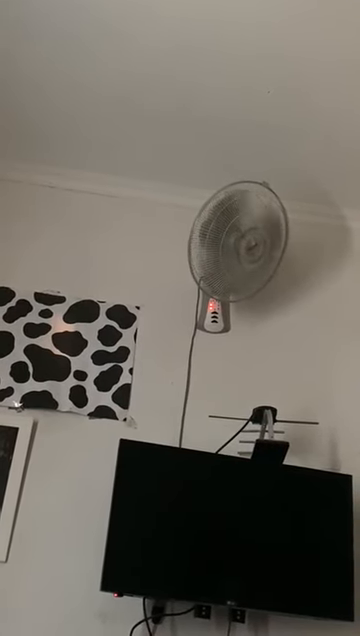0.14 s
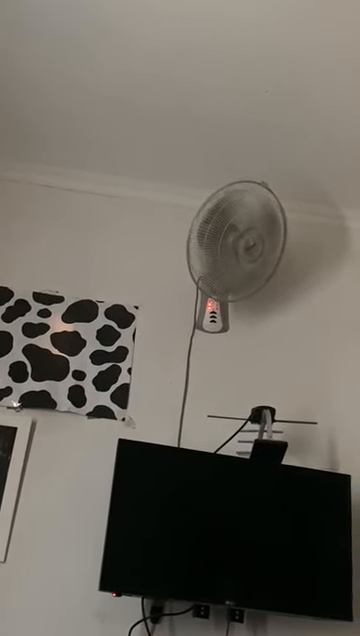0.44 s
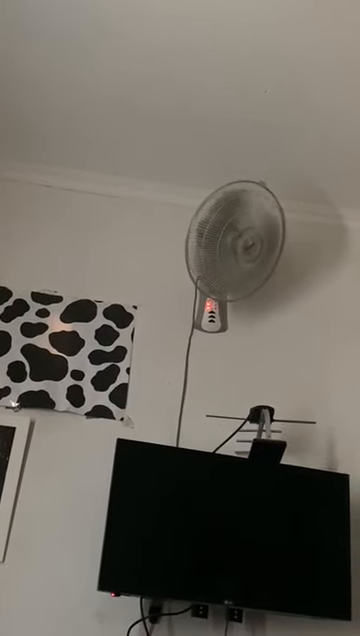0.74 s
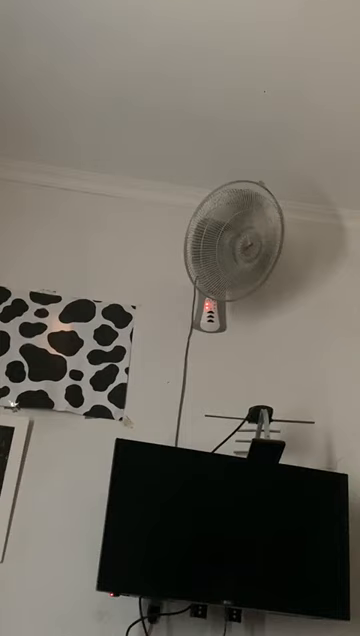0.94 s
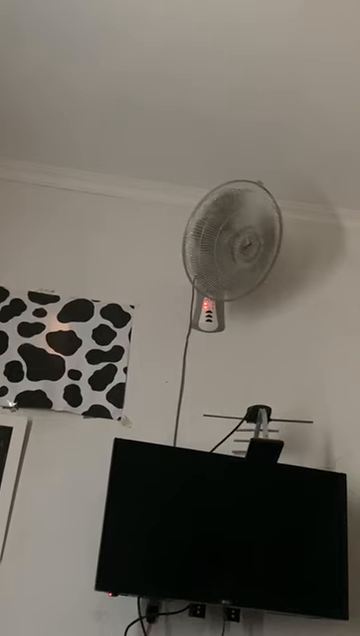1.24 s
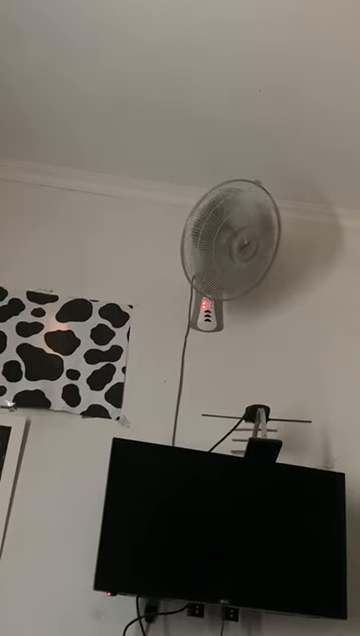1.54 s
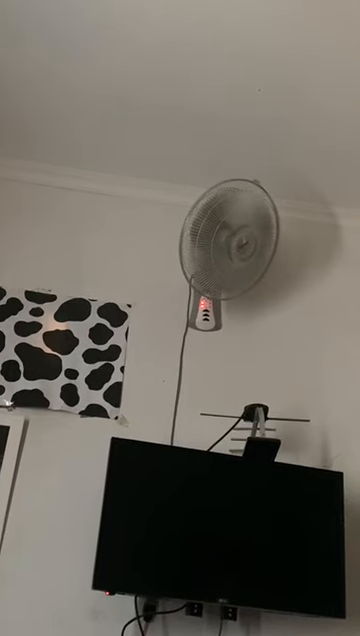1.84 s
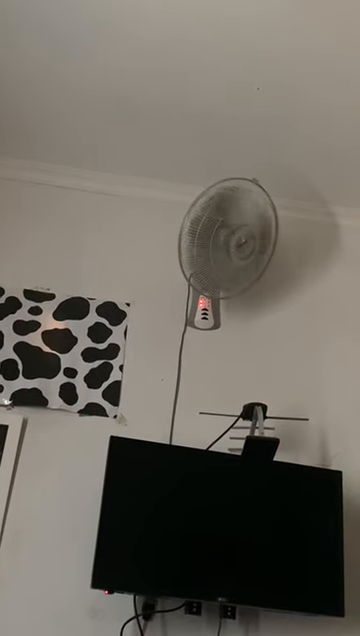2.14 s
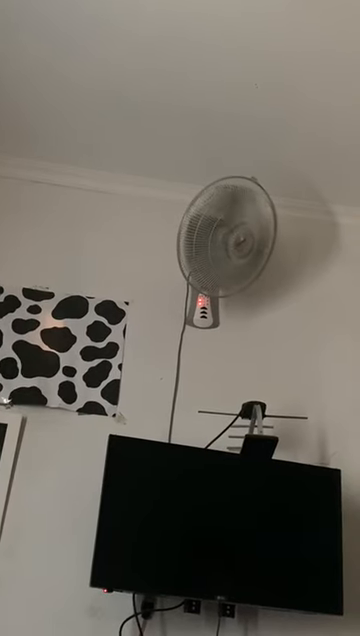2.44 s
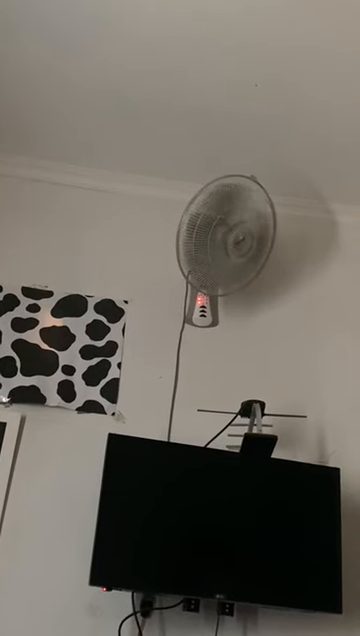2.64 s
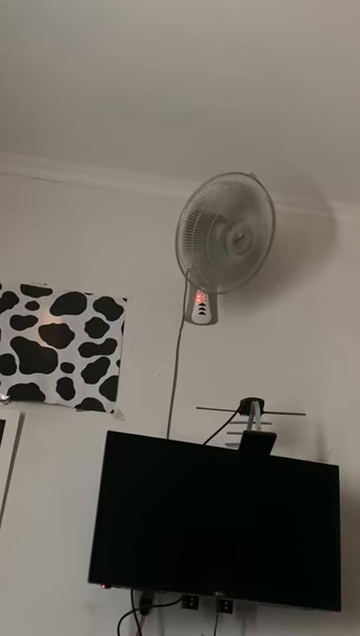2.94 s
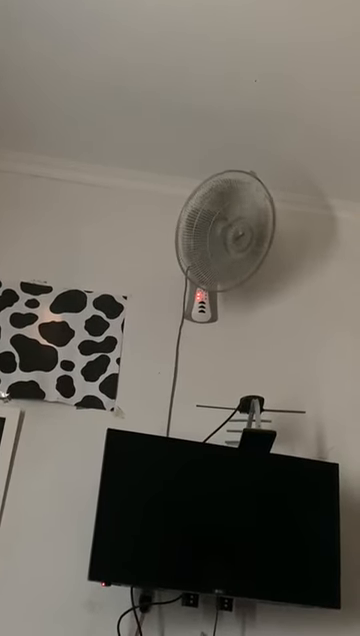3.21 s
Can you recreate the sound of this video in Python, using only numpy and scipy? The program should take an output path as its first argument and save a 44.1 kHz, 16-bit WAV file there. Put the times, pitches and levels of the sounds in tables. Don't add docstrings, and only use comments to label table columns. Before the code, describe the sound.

Continuous motor hum and soft moving air from a wall fan, with a fast fluttering rattle that speeds up and hardens gradually; small room, close stereo pickup with thin, patchy treble.

```python
import sys
import numpy as np
from scipy import signal
from scipy.fft import rfft, irfft
from scipy.io import wavfile

SR = 44100
rng = np.random.default_rng(int(sys.argv[2]) if len(sys.argv) > 2 else 0)


def master(y):
    cut = np.clip(np.atleast_2d(y).T, -1, 1)
    pcm = np.round(cut * 32767)
    wavfile.write(sys.argv[1], SR, pcm.astype(np.int16))


def magnitude_from_level(level_db):
    exponent = np.asarray(level_db, float) / 20
    return 10 ** exponent


N = 148617

# t/s, f/Hz
WOBBLE_RATE = [(0.0, 5.992), (0.48, 6.683), (0.96, 7.201), (1.44, 7.578), (1.93, 7.847), (2.41, 8.041),
               (2.89, 8.192), (3.37, 8.332)]
# order/1, level/dB
HUM_OVERTONES = [(1, -52.5), (2, -67.5), (3, -69.5), (4, -66.5), (5, -57.5), (6, -68), (7, -61), (8, -58.5),
                 (9, -62), (10, -67.5), (11, -78.5), (12, -76.5), (13, -63.5), (14, -72), (15, -75),
                 (16, -71), (17, -96), (18, -84.3), (19, -81.0), (20, -78), (21, -80.5), (22, -100.1),
                 (23, -81)]
# order/1, offset/(beats per wobble), level/dB, swell lag/beats
THROB_SIDEBANDS = [(2, -1, -65.8, 0.46), (2, 1, -58.9, 0.58), (3, -3, -76.0, 0.45), (3, -1, -53.4, 0.13),
                   (3, 1, -51.3, 0.02), (3, 2, -72.3, 0.76), (4, -2, -74.3, 0.98), (4, -1, -66.0, 0.17),
                   (4, 1, -62.7, 0.08), (4, 2, -66.5, 0.77), (4, 3, -77.7, 0.23), (5, -5, -76.5, 0.18),
                   (5, -4, -74.3, 0.37), (5, -3, -65.3, 0.82), (5, -2, -71.2, 0.79), (5, -1, -57.7, 0.83),
                   (5, 1, -57.2, 0.8), (5, 2, -69.5, 0.81), (5, 3, -75.8, 0.35), (5, 4, -78.3, 0.06),
                   (6, -2, -62.1, 0.89), (6, -1, -61.1, 0.11), (6, 1, -71.2, 0.01), (6, 2, -67.6, 0.24),
                   (7, -2, -68.2, 0.79), (7, -1, -68.2, 0.77), (7, 1, -60.3, 0.39), (7, 2, -71.6, 0.64),
                   (7, 3, -69.3, 0.75), (8, -3, -69.4, 0.91), (8, -2, -68.2, 0.18), (8, -1, -66.4, 0.45),
                   (8, 1, -66.0, 0.2), (8, 3, -77.1, 0.67), (9, -4, -74.4, 0.52), (9, -3, -68.0, 0.12),
                   (9, -2, -70.7, 0.64), (9, -1, -61.5, 0.29), (9, 1, -61.5, 0.69), (9, 2, -75.3, 0.54),
                   (9, 3, -70.7, 0.55), (10, -3, -74.9, 0.43), (10, -1, -65.4, 0.56), (10, 2, -75.8, 0.41),
                   (11, -4, -82.9, 0.76), (11, -3, -79.9, 0.59), (11, -2, -71.9, 0.45),
                  (11, -1, -73.5, 0.08), (11, 1, -68.8, 0.08), (11, 2, -79.5, 0.47), (12, -3, -83.1, 0.36),
                  (12, 1, -82.8, 0.43), (13, -4, -81.1, 0.07), (13, -3, -80.4, 0.82), (13, -2, -81.4, 0.26),
                  (13, -1, -75.9, 0.86), (14, 3, -82.4, 0.89), (15, -2, -78.5, 0.82), (15, -1, -76.6, 0.53),
                  (16, -1, -81.9, 0.22), (17, 1, -79.6, 0.55), (17, 2, -80.8, 0.51), (18, -3, -81.2, 0.77),
                  (18, -2, -79.8, 0.89), (18, 1, -80.8, 0.12), (18, 2, -82.7, 0.24), (18, 3, -80.0, 0.33),
                  (18, 5, -81.2, 0.84), (19, -3, -80.9, 0.23), (19, -1, -76.1, 0.84), (19, 1, -79.1, 0.41),
                  (19, 4, -82.5, 0.97), (20, -2, -83.0, 0.17), (20, -1, -77.6, 0.01), (20, 3, -82.7, 0.85),
                  (21, -5, -80.4, 0.84), (21, 1, -75.6, 0.89), (21, 2, -73.3, 0.04), (21, 3, -76.9, 0.13),
                  (23, 1, -81.3, 0.08)]
# f/Hz, level/dB
AIR_SPECTRUM = [(22, -12.5), (80, 1.5), (220, -10), (490, -2), (680, -9.5), (900, -5.5), (1200, -12.5),
                (4000, -37)]
# angle/turns, level/dB
SLACK_CYCLE = [(0, 1), (.2, -1), (.35, -7), (.55, -8), (.68, -8), (.77, 0), (.9, 1.1), (1, 0)]
# f/Hz, level/dB
CHATTER_SPECTRUM = [(1550, -12.5), (1850, 3), (2120, -1), (2350, -6), (4000, -3), (6000, -2.5), (9500, -8),
                    (12500, -15)]
# place/pulls, strongest wobble angle/turns, width/turns, level/dB
TICK_PLACES = [
    (0, .88, .06, -33.5),
    (0, .17, .05, -39),
    (0, .55, .08, -52),
    (.26, .97, .04, -40),
    (.45, .95, .04, -46),
]
# f/Hz, width/Hz, level/dB
GUARD_MODES = [(3270, 390, -12.5), (4070, 545, -4), (5840, 690, -0.5), (7720, 2300, -3.5),
               (10300, 1300, -8.5)]
# f/Hz, left minus right level/dB
PORT_BALANCE = [(150, -0.04), (400, 3), (700, 2.5), (900, 11.5), (1010, 1), (1110, 11), (1300, -0.5),
                (2300, 0.26)]
# f/Hz, phase/rad
PORT_PHASE = [(600, -0.18), (800, 0.5), (1400, 0.26), (4200, 0.37), (5100, 2.5), (5500, 1.57),
              (6200, 1.7857), (7800, 2.5)]
# f/Hz, level/dB
WALL_SPECTRUM = [(100, -34.5), (300, -22.5), (600, -10.5), (1000, -5), (1600, -11), (2300, -10)]
# f/Hz, level per bin/dB
MUTE_FLOOR = [(4000, -100), (5200, -95.5), (8000, -94.5), (9500, -92), (11500, -89.5)]
# f/Hz, spread/dB
MUTE_FLOOR_SPREAD = [(5000, 2), (8000, 4), (10000, 7)]
# t/s, from f/Hz, to f/Hz
UNMUTED_MOMENTS = [(.045, 1900, 8000), (.08, 7100, 7500), (.065, 11200, 11350), (.22, 1900, 7600),
                   (.222, 8400, 9400), (.378, 6900, 7700), (.378, 7950, 8150), (.533, 11200, 11500),
                   (.54, 7050, 7300), (.683, 6950, 7600), (.818, 6950, 7600), (.888, 7050, 7250),
                   (.888, 7450, 7650), (1.26, 7050, 7250), (1.26, 7450, 7650), (1.364, 1900, 11800),
                   (1.4915, 1900, 11800), (1.56, 6950, 7150), (1.631, 1900, 11800), (1.933, 7200, 7400),
                   (2.012, 1900, 11800), (2.035, 7050, 7250), (2.188, 7150, 7350), (2.2575, 1900, 11800),
                   (2.31, 7200, 7500), (2.53, 7050, 7250), (2.555, 7150, 7600), (2.63, 7350, 7550),
                   (2.885, 6900, 7300), (2.955, 7150, 7350), (3.0, 7350, 7600), (3.048, 7150, 7350)]

HUM_HZ, FIRST_PULL_S, FIRST_TURN = 100.142, .2388, .444
GROWTH_DB_PER_HZ, WAVER_DB, WAVER_TURNS, THROB_DB = 1.65, 1.37, .026, .5
BLADE_HZ, BLADE_DB, BLADE_WAVER_DB, AIR_DB = 48.84, -61, 3.5, -54
CHATTER_DB, CHATTER_SPREAD_DB, CHATTER_JITTER_S, FIZZ_DB = -57, 2, .0001, -56.5
TICK_SPREAD_DB = 1.2
ROOM_DB, ROOM_T60_S = -4, 0.14
START_S, START_DB = 0.046, 0.5
MUTE_FROM_HZ, MUTE_UNDER_DB, MUTE_CHANCE_DB = 2050, -6.5, 3.2
SUM_TOP_HZ, SUM_TOP_SPREAD_HZ, SUM_STRICTER_DB = 6550, 170, 2.5


def evened(x):
    return x / np.sqrt(np.mean(x ** 2) + 1e-20)


def read(points, hz):
    f, value = np.transpose(points)
    return np.interp(np.log(hz + 1), np.log(f + 1), value)


def coloured(x, points):
    gain = magnitude_from_level(read(points, np.fft.rfftfreq(N, 1 / SR)))
    return irfft(rfft(x) * gain, N)


def drift(top_hz, count=1):
    noise = rng.standard_normal((count, N // 220 + 300))
    steps = signal.lfilter(*signal.butter(2, top_hz / 100), noise)[:, 200:]
    at = np.arange(N) / 220.5
    return [np.interp(at, np.arange(len(s)), evened(s)) for s in steps]


def wobble():
    rate_hz = np.interp(np.arange(N) / SR, *np.transpose(WOBBLE_RATE))
    return FIRST_TURN + np.cumsum(rate_hz) / SR, GROWTH_DB_PER_HZ * (rate_hz - 7.6)


def motor():
    turn, growth_db = wobble()
    pulls, out = HUM_HZ * np.arange(N) / SR, np.zeros(N)
    start = rng.random(30)
    steady = [(order, 0, db, 0) for order, db in HUM_OVERTONES]
    waver = drift(22, count=16)
    for i, (order, beats, db, lag) in enumerate(steady + THROB_SIDEBANDS):
        loose = np.clip((order - 2) / 3, .2, 1.6) * (1 if beats else .6)
        angle = order * pulls + beats * turn - lag + start[order]
        angle += WAVER_TURNS * loose * waver[i % 16]
        level_db = db + 3 + WAVER_DB * loose * waver[(i * 5 + 3) % 16]
        if order > 3:
            level_db += growth_db + THROB_DB * (beats != 0)
        out += magnitude_from_level(level_db) * np.cos(2 * np.pi * angle)
    return out


def blades():
    slow, sway = drift(12.0, count=2)
    angle = BLADE_HZ * np.arange(N) / SR + 0.026 * sway
    tone = magnitude_from_level(BLADE_DB + 3 + BLADE_WAVER_DB * slow) * np.cos(2 * np.pi * angle)
    air = evened(coloured(rng.standard_normal(N), AIR_SPECTRUM))
    return tone + magnitude_from_level(AIR_DB) * air


def chatter(count=14):
    turn, growth_db = wobble()
    pull_s = np.arange(0, N / SR - .03, 1 / HUM_HZ)
    at = turn[(pull_s * SR).astype(int)][:, None]
    place, slide, own = rng.random((count, 3)).T
    chance = rng.standard_normal((len(pull_s), count, 2))
    moved = (place + .08 * np.sin(2 * np.pi * (at + slide))) % 1
    knock_s = pull_s[:, None] + moved / HUM_HZ + CHATTER_JITTER_S * abs(chance[..., 0])
    swell = 0.67 * np.sin(2 * np.pi * (2 * at + own))
    size = magnitude_from_level(CHATTER_SPREAD_DB * (chance[..., 1] + swell)) * np.sign(slide - .5)
    knocks = np.bincount((knock_s * SR).astype(int).ravel(), size.ravel(), N)[:N]
    mix = magnitude_from_level(CHATTER_DB) * evened(coloured(knocks, CHATTER_SPECTRUM))
    mix += magnitude_from_level(FIZZ_DB) * evened(coloured(rng.standard_normal(N), CHATTER_SPECTRUM))
    return mix * magnitude_from_level(np.interp(turn % 1, *np.transpose(SLACK_CYCLE)) + growth_db)


def ticks():
    turn, growth_db = wobble()
    pull_s = FIRST_PULL_S % (1 / HUM_HZ) + np.arange(0, N / SR - .02, 1 / HUM_HZ)
    chance, train = rng.standard_normal((len(pull_s), len(TICK_PLACES))), np.zeros(N)
    for i, (place, mid, width, db) in enumerate(TICK_PLACES):
        at = ((pull_s + place / HUM_HZ) * SR).astype(int)
        off = (turn[at] - mid + .5) % 1 - .5
        level_db = db + TICK_SPREAD_DB * chance[:, i] + 1.1 * growth_db[at]
        train[at] += magnitude_from_level(level_db) * np.exp(-.5 * (off / width) ** 2)
    t = np.arange(400) / SR
    ring = np.zeros(400)
    for hz, width_hz, db in GUARD_MODES:
        ring += magnitude_from_level(db) * np.exp(-np.pi * width_hz * t) * np.sin(2 * np.pi * hz * t)
    return signal.oaconvolve(train, ring * np.minimum(t / 0.00013, 1))[:N]


def ports(x):
    hz = np.fft.rfftfreq(N, 1 / SR)
    left, phase = magnitude_from_level(read(PORT_BALANCE, hz)), np.exp(.5j * read(PORT_PHASE, hz))
    return irfft(rfft(x) * 2 / (1 + left) * np.array([left * phase, 1 / phase]), N)


def tails(x):
    taps = np.zeros((3, SR // 2))
    at = np.arange(100, SR // 2 - 20, 20) + rng.integers(0, 20, (3, (SR // 2 - 101) // 20))
    np.put_along_axis(taps, at, rng.choice([-1., 1.], at.shape), 1)
    taps *= magnitude_from_level(-60 * np.arange(SR // 2) / SR / ROOM_T60_S)
    return signal.fftconvolve(x[None], taps / np.linalg.norm(taps[0]), axes=1)[:, :N]


def room(x, apart=.5):
    wet = magnitude_from_level(ROOM_DB) * tails(x)
    return ports(x + wet[0]) + apart * wet[1:]


def muted(x, size=8):
    lead = 272
    pair = np.pad([x[0] + x[1], x[0] - x[1]], ((0, 0), (lead, 0))) / 2
    hz, t, z = signal.stft(pair, SR, "cosine", nperseg=2048, noverlap=1024)
    power = (abs(z[:, :1024]) ** 2).reshape(2, -1, size, len(t)).mean(axis=2)
    judged = power * magnitude_from_level(2 * MUTE_CHANCE_DB * rng.standard_normal(power.shape))
    band = hz[:1024:size, None] + size * hz[1] / 2
    floor_db = read(MUTE_FLOOR, band) + read(MUTE_FLOOR_SPREAD, band) * rng.standard_normal(power.shape)
    keep = (judged > power[::-1] * magnitude_from_level(2 * MUTE_UNDER_DB)) & (power > magnitude_from_level(2 * floor_db))
    keep[0] &= band < SUM_TOP_HZ + SUM_TOP_SPREAD_HZ * rng.standard_normal(len(t))
    keep[0] &= judged[0] > power[1] * magnitude_from_level(2 * (MUTE_UNDER_DB + SUM_STRICTER_DB))
    keep |= band < MUTE_FROM_HZ
    for s, low, high in UNMUTED_MOMENTS:
        keep |= (abs(t - lead / SR - s) < .0125) & (band > low) & (band < high)
    z[:, :1024] *= np.repeat(keep, size, axis=1)
    back = signal.istft(z, SR, "cosine", nperseg=2048, noverlap=1024)[1]
    mid, side = back[:, lead:N + lead]
    return np.array([mid + side, mid - side])


def scene():
    hum = motor() + blades()
    walls = coloured(tails(hum)[0], WALL_SPECTRUM) * [[1], [-1]]
    return ports(hum) + walls + room(chatter() + ticks())


def band_limit(x):
    return signal.sosfilt(signal.butter(12, 11790, fs=SR, output="sos"), x)


def record(dry):
    settling = magnitude_from_level(START_DB * np.exp(-np.arange(N) / SR / START_S))
    mix = muted(dry * settling)
    return band_limit(mix)


dry = scene()
out = record(dry)
master(out)
```